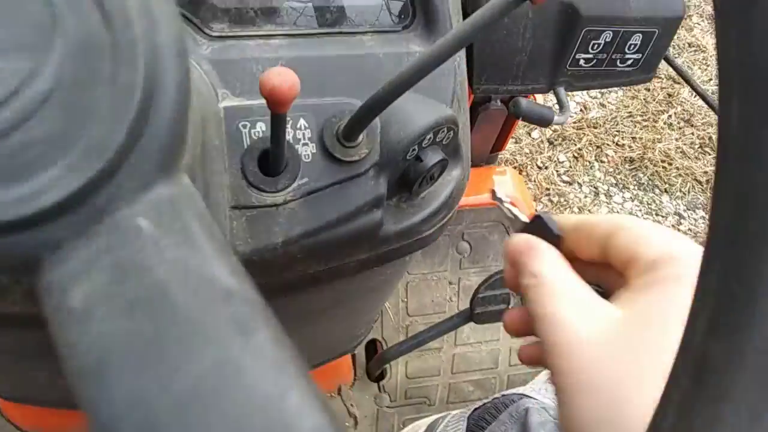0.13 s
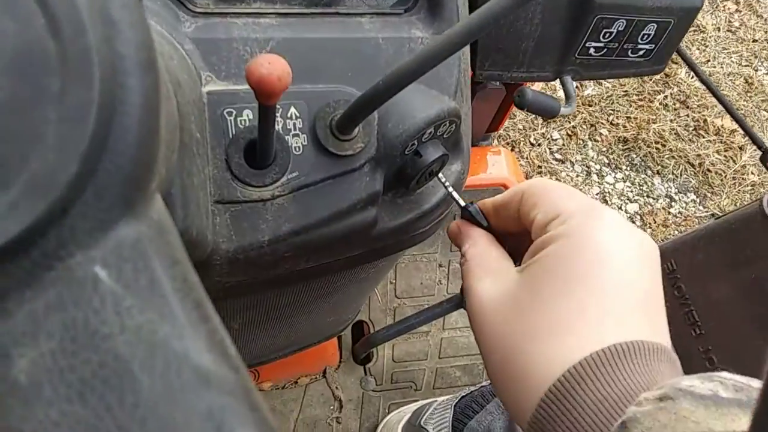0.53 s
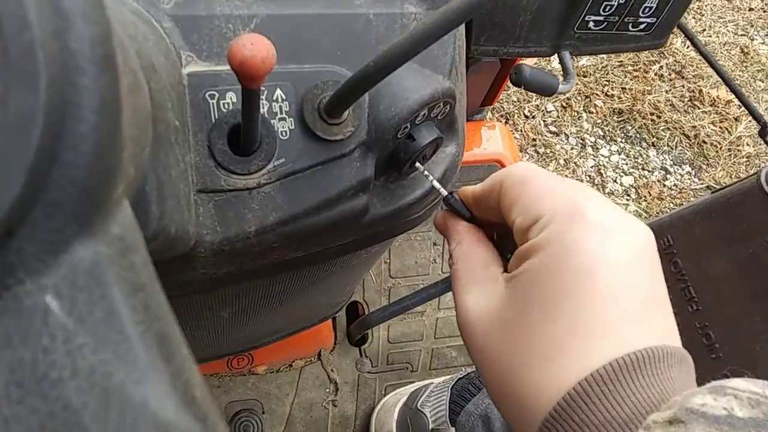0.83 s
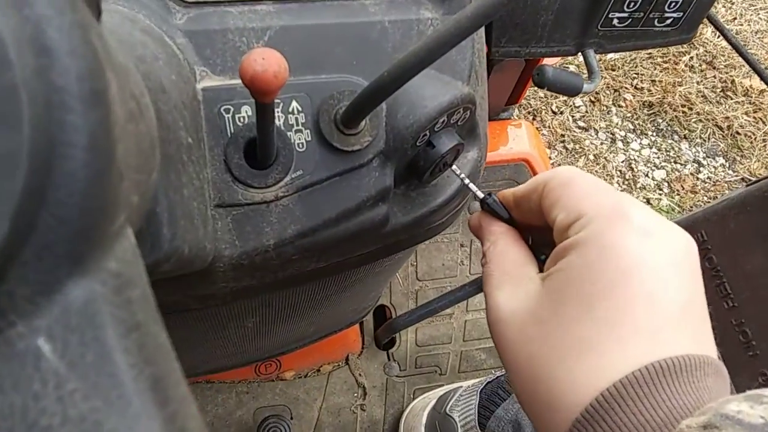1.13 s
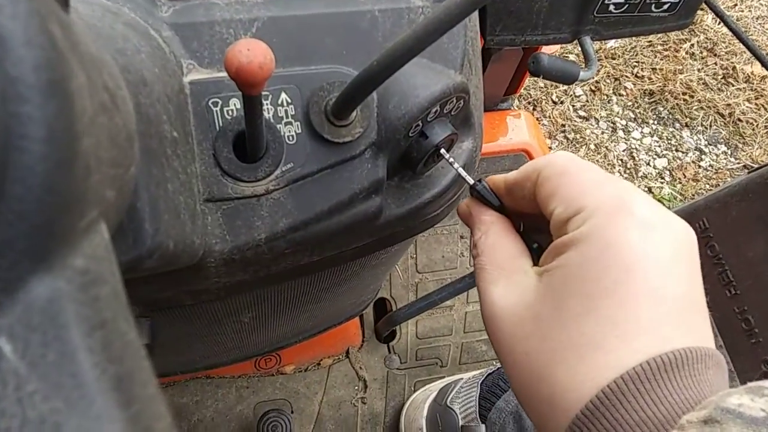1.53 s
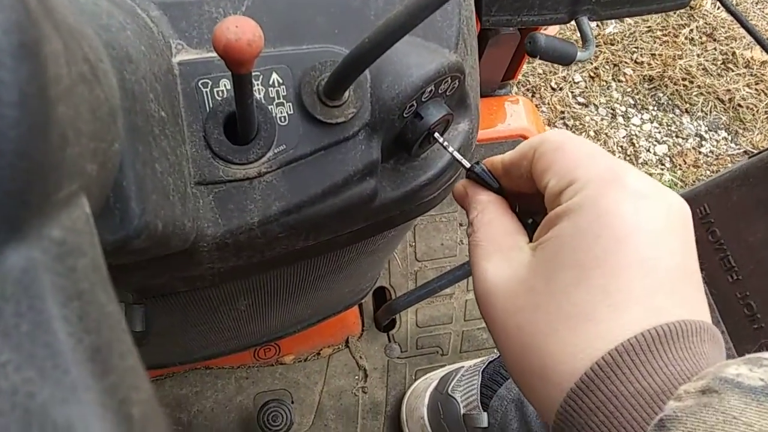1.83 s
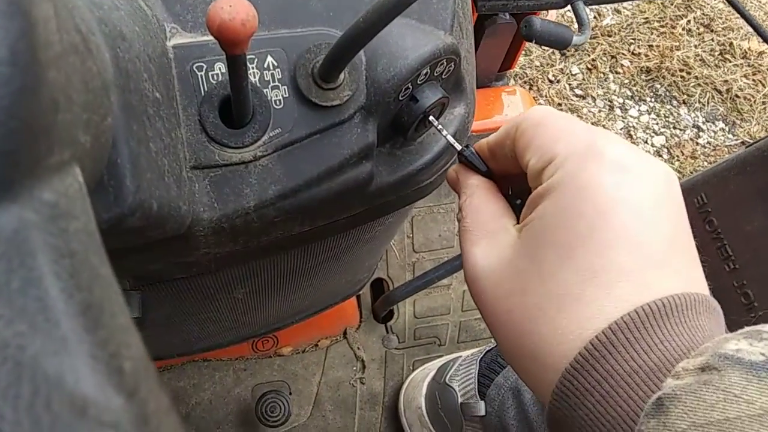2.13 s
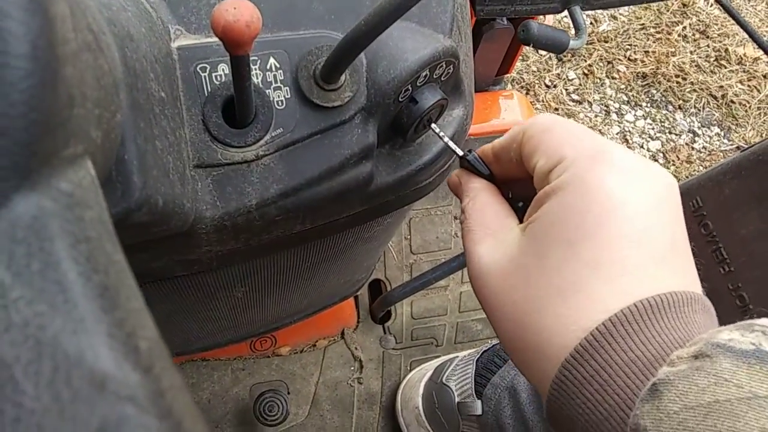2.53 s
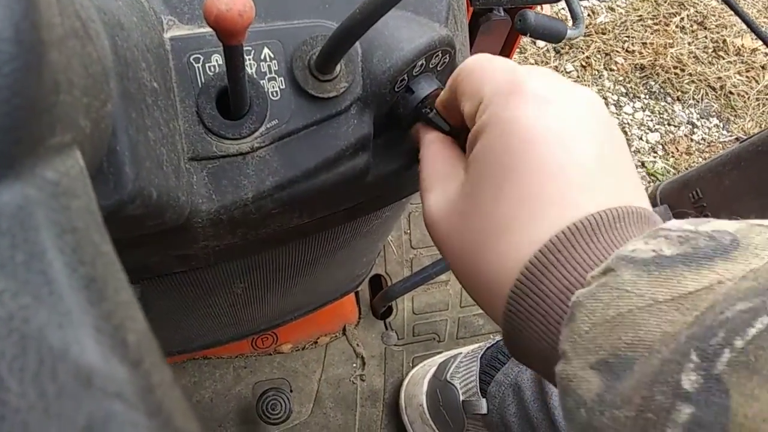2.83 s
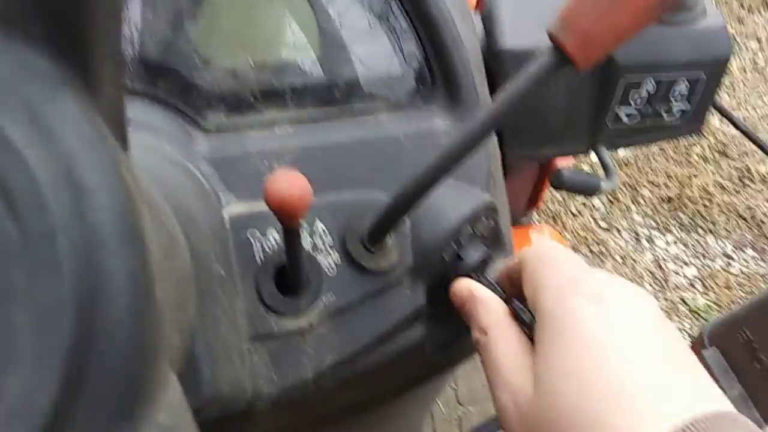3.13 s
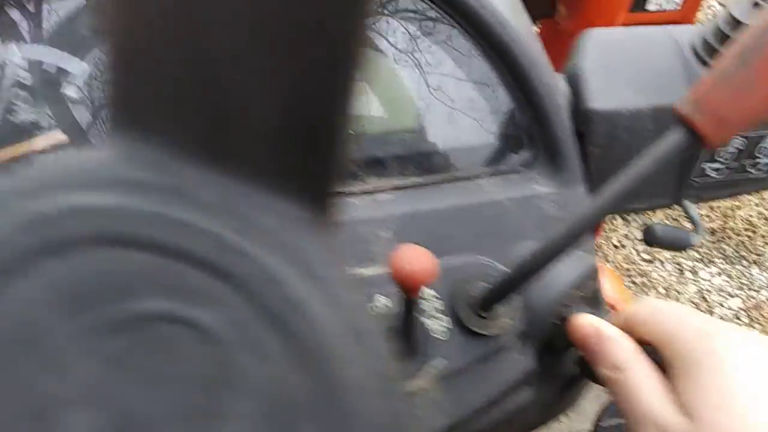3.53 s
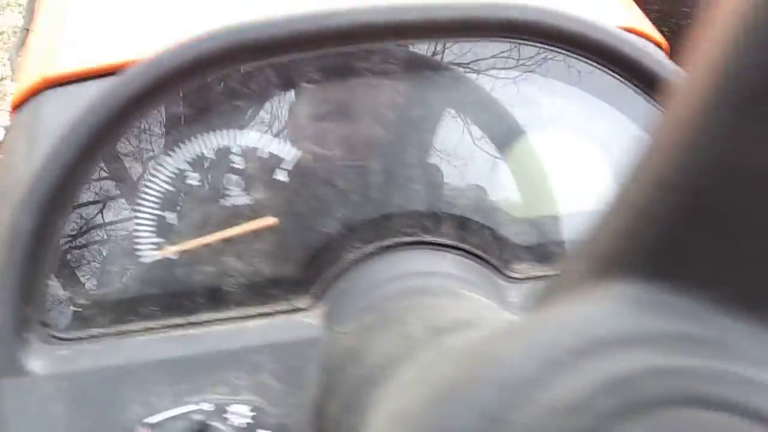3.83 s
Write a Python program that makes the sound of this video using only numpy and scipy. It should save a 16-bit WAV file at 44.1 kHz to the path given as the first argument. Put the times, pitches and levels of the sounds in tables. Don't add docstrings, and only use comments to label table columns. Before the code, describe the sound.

Key in a tractor ignition, close and dry: sleeve rustle and light taps, a pause, a crunchy clicking insertion, small knocks, one loud snap, then rapid relay chatter; faint bird in quiet outdoor air.

```python
import sys
import numpy as np
from scipy import signal
from scipy.fft import rfft, irfft, next_fast_len
from scipy.io import wavfile

SR = 44100
rng = np.random.default_rng(int(sys.argv[2]) if len(sys.argv) > 2 else 0)


def unload_audio(sound):
    columns = np.transpose(np.atleast_2d(sound))
    steps = np.round(np.clip(columns, -1, 1) * 32767)
    wavfile.write(sys.argv[1], SR, steps.astype(np.int16))


def attenuation_scalar(level_db):
    decades = np.asarray(level_db, float) / 20
    return 10 ** decades


N = 176400
SNAP_S = 3.4928


def at_hz(points, hz):
    table_hz, table_db = np.transpose(points)
    return np.interp(np.log(hz), np.log(table_hz), table_db)


def rms_one(x):
    return x / np.sqrt(np.mean(x ** 2) + 1e-20)


def drift(rate):
    pole = np.exp(-80 * np.pi * rate / SR)
    slow = signal.lfilter([1], [1, -2 * pole, pole * pole], rng.standard_normal(N // 40 + 2002))
    slow = slow[2000:]
    return np.interp(np.arange(N) / 40, np.arange(len(slow)), rms_one(slow))


def ring(force, hz, t60):
    radius = 10 ** (-3 / (t60 * SR))
    angle = 2 * np.pi * hz / SR
    return signal.lfilter([0, np.sin(angle)], [1, -2 * radius * np.cos(angle), radius ** 2], force + 1e-18)


def bandpass(x, low_hz, high_hz):
    return signal.sosfilt(signal.butter(2, [low_hz, high_hz], "band", fs=SR, output="sos"), x)


def strike(times, db, modes, contact_s, spread_db, detune, clean=0):
    out = np.zeros(N + SR)
    age = np.arange(600) / SR
    contact = age * np.exp(-age / contact_s)
    for s, level_db in zip(times, db):
        draws = rng.standard_normal((len(modes), 602))
        draws[:, 2:] += clean * (-1) ** np.arange(len(modes))[:, None]
        for row, (hz, mode_db, t60) in zip(draws, modes):
            hz = hz * (1 + detune * row[0])
            force = row[2:] * contact
            at_mode = np.abs(force @ np.exp(-2j * np.pi * hz * age))
            force = force / (at_mode + .2 * np.linalg.norm(force))
            sound = ring(np.pad(force, (0, int(min(t60, .3) * SR))), hz, t60)
            out[int(s * SR):][:len(sound)] += attenuation_scalar(level_db + mode_db + spread_db * row[1]) * sound
    return out[:N]


def banded_noise(spectrum, patchy_db, flicker_db):
    out = 0
    together = drift(6.0)
    edges = 20 * 2 ** np.arange(0, 9.9, 1 / 3)
    white = rng.standard_normal((2, N))
    for k, (low, high) in enumerate(zip(edges, edges[1:])):
        level_db = at_hz(spectrum, np.sqrt(low * high)) + patchy_db * together + flicker_db * drift(16.0)
        out = out + bandpass(white[k % 2], low, high) * attenuation_scalar(level_db)
    return rms_one(out)


def air():
    # frequency in Hz, spectral density in dB per Hz.
    air_spectrum = [(30, -52), (110, -22), (250, 2.5), (520, -0.5), (1500, -7.5), (4000, -14), (7200, -25),
                    (11000, -18)]
    return attenuation_scalar(-64.5) * banded_noise(air_spectrum, patchy_db=.3, flicker_db=.8)


def bird():
    # start in seconds, length in seconds, first Hz, last Hz, level in dB.
    calls = [
        (1.38, .06, 3570, 3630, -75),
        (1.46, .15, 3680, 3480, -75),
        (1.62, .13, 3430, 3230, -73.5),
    ]
    throb_hz, throb_depth, waver_hz = 28.0, .5, 11.9
    t, out = np.arange(N) / SR, np.zeros(N)
    waver = waver_hz * drift(30.0)
    for s, length, from_hz, to_hz, db in calls:
        way = np.clip((t - s) / length, 0, 1)
        swell = np.sqrt(np.sin(np.pi * way).clip(0))
        hz = from_hz + (to_hz - from_hz) * way + waver
        out += attenuation_scalar(db) * swell * np.sin(2 * np.pi * np.cumsum(hz) / SR)
    return np.sqrt(2) * out * (1 + throb_depth * np.sin(2 * np.pi * throb_hz * t))


def sleeve():
    # time in seconds, level in dB.
    sweep = [
        (0, -52.5),
        (.05, -53),
        (.09, -49),
        (.22, -47.5),
        (.32, -56.5),
        (.5, -63.5),
        (.62, -69.5),
        (.8, -68.5),
        (1.0, -76),
    ]
    # time in seconds, level in dB.
    grip = [
        (2.7, -78),
        (2.9, -39.5),
        (2.99, -58.5),
        (3.19, -51),
        (3.28, -68.5),
        (3.5, -63),
        (3.62, -61),
        (3.8, -57.5),
        (3.93, -51),
    ]
    # frequency in Hz, spectral density in dB per Hz.
    cloth_spectrum = [(40, -49), (120, -18.5), (280, -3), (520, -1.5), (1400, -7), (6500, -11.5),
                      (8000, -18.5), (15000, -20.5)]
    # frequency in Hz, spectral density in dB per Hz.
    skin_spectrum = [(40, -48), (170, -34), (280, 0), (600, -2), (1500, -7), (3000, -13), (6000, -25),
                     (15000, -38)]
    t = np.arange(N) / SR
    cloth = attenuation_scalar(np.interp(t, *np.transpose(sweep))) * banded_noise(cloth_spectrum, patchy_db=2.5, flicker_db=1.14)
    skin = attenuation_scalar(np.interp(t, *np.transpose(grip))) * banded_noise(skin_spectrum, patchy_db=2.0, flicker_db=2.5)
    return cloth + skin


def cab(x):
    t60_s, treble_cut_hz = .14, 4400
    size = next_fast_len(N + SR)
    hz = np.arange(size // 2 + 1) * SR / size
    response = 0
    for k, lag in enumerate(rng.uniform(.004, .017, 8)):
        one_round = attenuation_scalar(-60 * lag / t60_s) / (1 + 1j * hz / treble_cut_hz) * np.exp(-2j * np.pi * hz * lag)
        response = response + (-1) ** k * (1 / (1 - one_round) - 1)
    return irfft(rfft(x, size) * response, size)[:N]


def relay():
    # start in seconds, level in dB.
    pulls = [(3.511, -40), (3.558, -47.5), (3.606, -60.5), (3.6522, -40.5), (3.6958, -45), (3.7411, -41),
             (3.785, -42.5), (3.830, -48), (3.8728, -44), (3.918, -42.5), (3.962, -44)]
    # frequency in Hz, level in dB, t60 in seconds.
    case_modes = [(1410, -5.5, 0.0067), (2200, -8, 0.011), (2480, -5, 0.0089), (3225, -1, 0.013),
                  (3570, -2.5, 0.0064), (4020, -6.5, 0.016), (4370, -4.5, 0.01), (4670, -5, 0.008),
                  (5130, -5.5, 0.0044), (6400, -12.5, 0.0049)]
    rise_s, buzz_s, tail_s, tail_db = 0.0024, 0.0059, 0.013, -11
    t, buzz = np.arange(N) / SR, np.zeros(N)
    for s, db in pulls:
        corners = s + np.cumsum([0, rise_s, buzz_s, .002, tail_s, .008])
        buzz += np.interp(t, corners, attenuation_scalar(db + np.array([-30, 0, -1, tail_db, tail_db, -40])), 0, 0)
    spikes = attenuation_scalar(2.58 * np.minimum(rng.exponential(1, N), 4))
    grit = rng.standard_normal((len(case_modes), N)) * spikes * buzz
    return 0.09 * sum(attenuation_scalar(db) * ring(g, hz, t60) for g, (hz, db, t60) in zip(grit, case_modes))


def push():
    width_s = 0.00058
    age = np.arange(N) / SR - SNAP_S
    return attenuation_scalar(-39) * np.exp(-(age / width_s - 1) ** 2)


def switch():
    # frequency in Hz, level in dB, t60 in seconds.
    switch_modes = [(295, -21.5, 0.15), (385, -13.5, 0.078), (546, -2.5, 0.06), (686, -2.5, .03),
                    (885, -2, 0.028), (1178, -6.5, 0.022), (1500, -5, 0.014), (1943, -1.5, 0.018),
                    (2330, -13.5, 0.022), (3010, -12.5, 0.03), (3450, -3, 0.018), (3860, -5, 0.015),
                    (4730, -18, .015), (6900, -8, 0.027)]
    crack_db, crack_t60_s = -20.5, 0.038
    age = np.arange(N) / SR - SNAP_S
    crack = attenuation_scalar(crack_db - 60 * np.abs(age) / crack_t60_s) * (age > 0) * rng.standard_normal(N)
    body = strike([SNAP_S], [-10], switch_modes, 0.00021, 0, 0, clean=2.0)
    body = signal.sosfilt(signal.butter(3, 300, "high", fs=SR, output="sos"), body)
    return body + bandpass(crack, 1200, 8500)


def cracks():
    # start in seconds, level in dB, low Hz, high Hz, t60 in seconds.
    bursts = [(.9283, -26, 2800, 6140, .012), (2.8397, -36, 5960, 14000, .012),
              (2.888, -25, 4000, 5960, .02), (2.9175, -38, 7000, 13000, .012),
              (3.132, -53, 7000, 15000, .015), (3.4668, -40, 7500, 13000, 0.022),
              (3.492, -13, 7000, 10000, .008), (3.649, -61, 7000, 12000, .04),
              (3.694, -57, 7000, 12400, .04), (3.783, -59, 7000, 12500, .05),
              (3.846, -55, 6000, 12000, 0.056), (3.859, -53, 6000, 15500, 0.044),
              (3.914, -55, 7500, 11000, 0.045), (3.9385, -55, 9500, 14000, .012),
              (3.9563, -41.5, 7500, 15500, 0.014), (2.8765, -38, 5000, 15000, .03),
              (2.893, -40, 1500, 7000, .1), (2.906, -38, 1500, 9000, .06), (2.92, -50.5, 2500, 9000, 0.23),
              (3.4815, -29, 2600, 7000, .02), (.542, -64, 3500, 10500, .1), (3.19, -44, 4100, 5300, .03),
              (3.2, -48, 4100, 5200, .03), (2.888, -36, 8000, 16000, .02), (1.342, -64, 4200, 8000, .04)]
    out, age = np.zeros(N + SR), np.arange(3000) / SR
    for s, db, low_hz, high_hz, t60 in bursts:
        onset = 1 - np.exp(-age / 0.00018)
        burst = rng.standard_normal(len(age)) * attenuation_scalar(db - 60 * age / t60) * onset
        out[int(s * SR):][:len(age)] += bandpass(burst, low_hz, high_hz)
    return out[:N]


def key():
    # start in seconds, then panel, lock body and blade levels in dB.
    touches = [(.174, -48.5, -55, -55), (.459, -49, -67, -66), (.897, -40.5, -53, -54.5),
               (.906, -40, -63, -68), (.929, -47, -52, -55), (0.937, -38.5, -57, -60),
               (1.042, -57.5, -74, -74), (1.234, -62.5, -79, -76), (1.341, -58.5, -68, -66),
               (1.645, -47, -55.5, -56), (1.679, -59, -69, -65), (1.732, -48, -57, -63)]
    # start in seconds, then panel, lock body and blade levels in dB.
    tumblers = [(2.806, -46, -43, -60), (2.840, -31.5, -31, -32), (2.862, -37, -46, -49),
                (2.873, -31, -33, -31), (2.876, -33, -29, -31), (2.887, -26.5, -26.5, -24.5),
                (2.898, -28.5, -53, -39), (2.904, -25.5, -31, -37), (2.909, -22.5, -29, -28.5),
                (2.917, -27, -37, -31), (2.926, -30.5, -50, -52)]
    # start in seconds, then panel, lock body and blade levels in dB.
    knocks = [(3.095, -52, -51, -56), (3.178, -53, -53, -59), (3.190, -38.5, -44, -46),
              (3.2, -41.5, -51, -52), (3.371, -44.5, -56, -60), (3.379, -57, -65, -57.5),
              (3.467, -62, -53, -53), (3.476, -37, -40, -46), (3.4804, -35, -33.5, -31.5),
              (3.672, -42, -53, -58), (3.709, -44, -58, -61), (3.753, -45, -44.5, -47.5),
              (3.762, -47, -65, -58), (3.802, -49, -64, -64), (3.850, -46, -45.5, -47),
              (3.957, -41, -39, -43.5)]
    # frequency in Hz, level in dB, t60 in seconds.
    panel_modes = [(273.3, -3, 0.09), (300, -9.5, 0.089), (394, -5.5, 0.049), (514, 4.5, 0.041),
                   (655, -0.5, 0.035), (789, 1.5, 0.02)]
    lock_modes = [(1234, -1, 0.0074), (1423, -3.5, 0.032), (1540, -10.5, 0.028), (1768, 0, 0.025),
                  (1993, -7, 0.042), (2360, -3, 0.018), (2500, -4.5, 0.033)]
    blade_modes = [(2916, -0.5, 0.018), (3245, -6.5, 0.035), (3670, -8.5, 0.011), (4030, 0, 0.022),
                   (4730, 2, 0.015), (5000, -10, 0.0099), (6000, -8, 0.0079), (6460, -5.5, 0.015),
                   (7770, -7, 0.005), (9440, -9, 0.014), (10000, -4.5, 0.0049), (12000, -40, 0.0044),
                   (13800, -12, .004)]
    # Hz, level in dB, t60 in seconds.
    face_modes = [(820, -3.5, 0.058), (1075, -4, 0.018), (1340, 1, 0.025), (1712, 3.5, 0.021),
                  (1960, 2, 0.022), (2530, -3.5, 0.032), (2940, -6, 0.035), (3260, -7, 0.031),
                  (3770, 0.5, 0.012), (4200, 0, 0.011), (4720, 5.5, 0.01), (5300, -1, 0.008),
                  (6040, -7, 0.0089), (10100, -22, .006)]
    deep_modes = [(272, -1.5, 0.14), (304.7, -4, 0.21), (358, 1.5, 0.053), (189, -9.5, 0.15)]
    plastic_s, metal_s = 0.0013, 0.00053
    vary = dict(spread_db=2.5, detune=0.038)
    s, panel_db, lock_db, blade_db = np.transpose(list(touches) + list(tumblers) + list(knocks))
    panel = strike(s, panel_db - 2.5, panel_modes, plastic_s, **vary)
    lock = strike(s, lock_db + 0.5, lock_modes, metal_s, **vary)
    blade = strike(s, blade_db - 3, blade_modes, metal_s, **vary)
    tip_tap = strike([.9282], [-32], face_modes, 0.00008, 0, 0, clean=10)
    seating = strike([2.9262], [-25], deep_modes, .0008, 0, 0)
    return panel + lock + blade + tip_tap + seating


def scene():
    near = key() + switch() + relay()
    near = signal.sosfilt(signal.butter(4, 228, "high", fs=SR, output="sos"), near)
    near = signal.sosfilt(signal.butter(6, 15500, fs=SR, output="sos"), near)
    room = attenuation_scalar(-18) * cab(near)
    beds = sleeve() + air() + cracks() + bird()
    beds = signal.sosfilt(signal.cheby2(12, 60, 15750 * 1.03, fs=SR, output="sos"), beds)
    return (near + room + push() + beds)[None]


def roll_off(x):
    return signal.sosfilt(signal.butter(12, 17010, fs=SR, output="sos"), x)


def record(dry):
    return roll_off(dry)


dry = scene()
out = record(dry)
unload_audio(out)
```